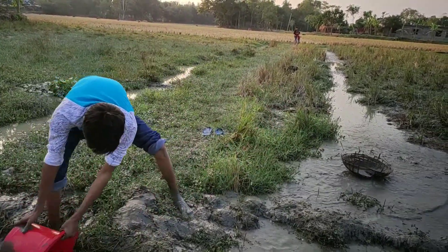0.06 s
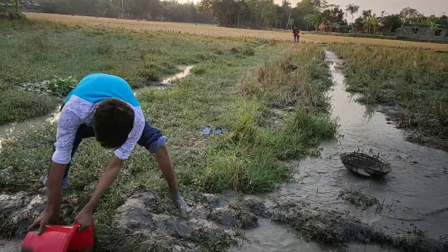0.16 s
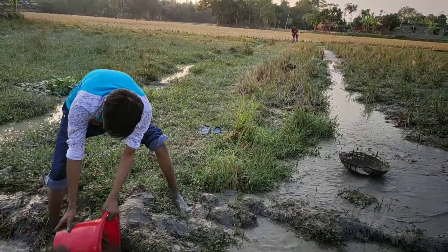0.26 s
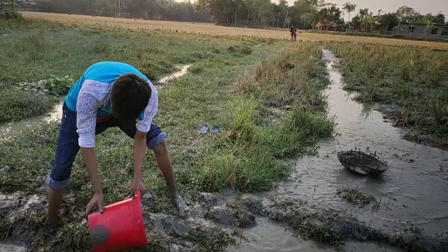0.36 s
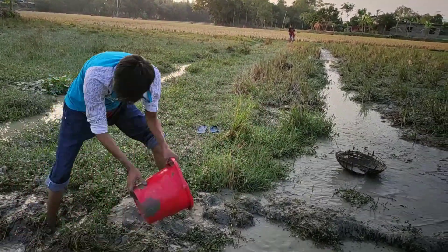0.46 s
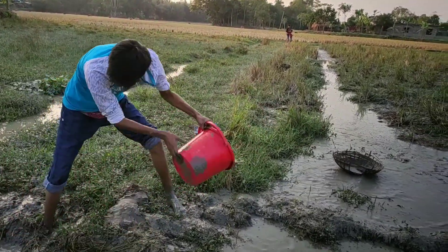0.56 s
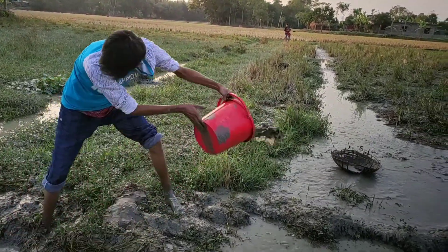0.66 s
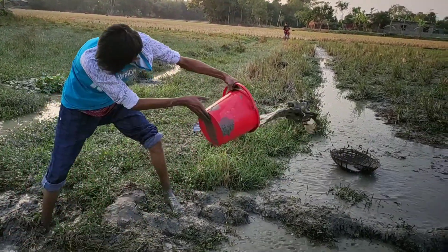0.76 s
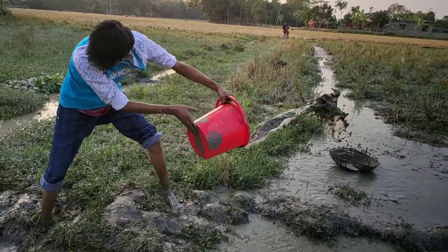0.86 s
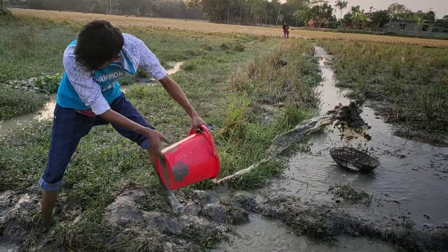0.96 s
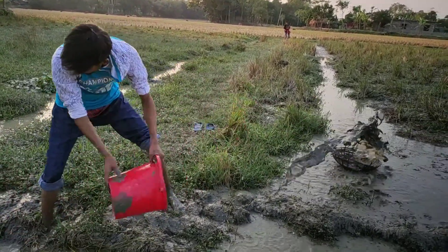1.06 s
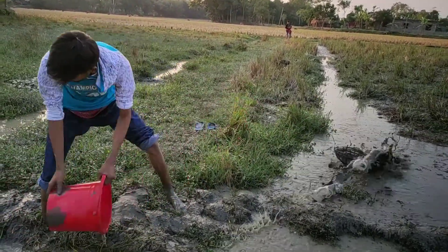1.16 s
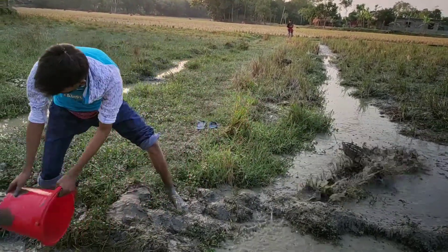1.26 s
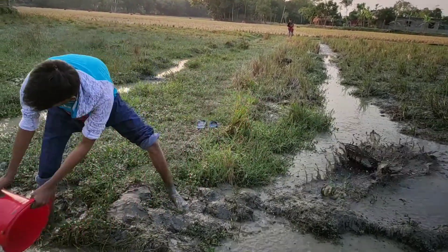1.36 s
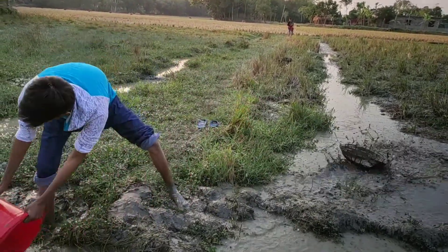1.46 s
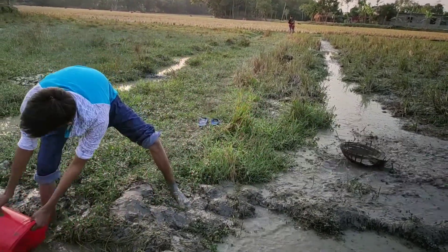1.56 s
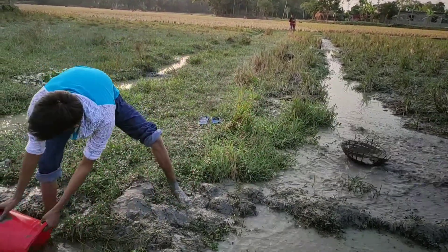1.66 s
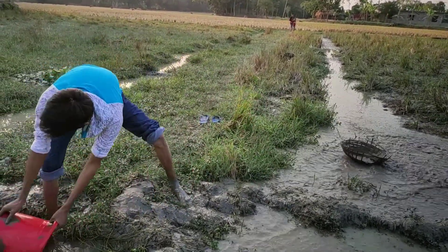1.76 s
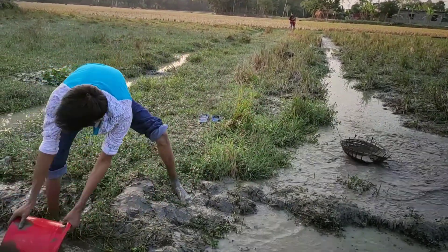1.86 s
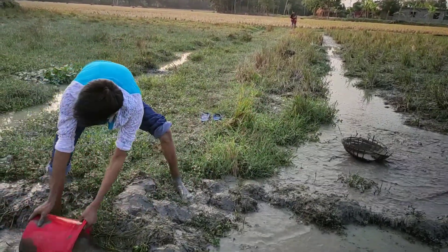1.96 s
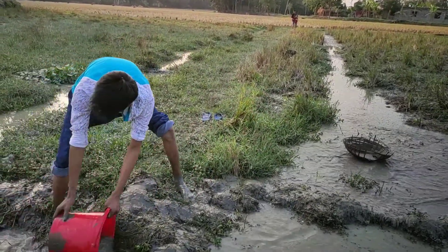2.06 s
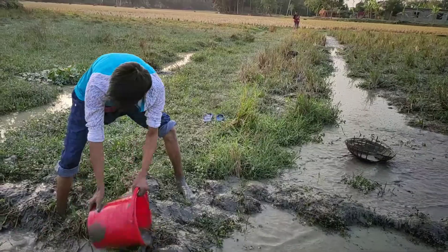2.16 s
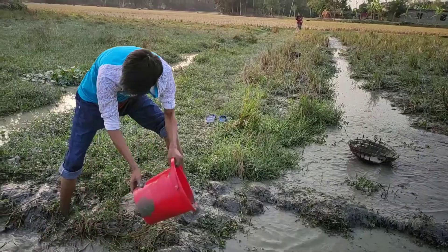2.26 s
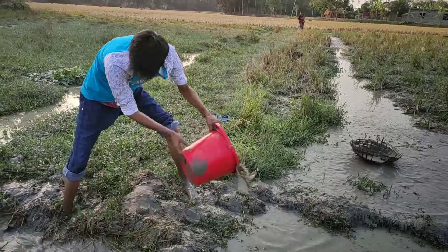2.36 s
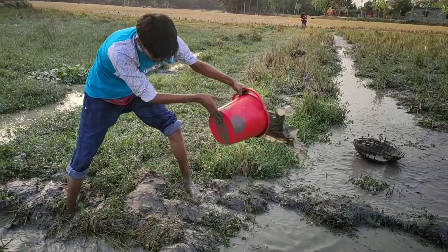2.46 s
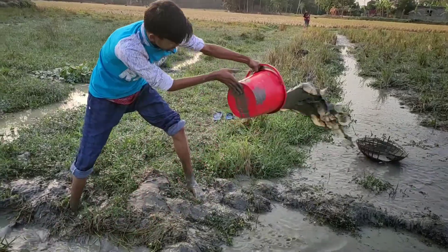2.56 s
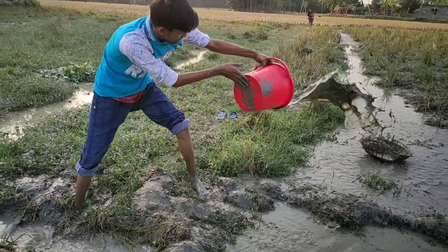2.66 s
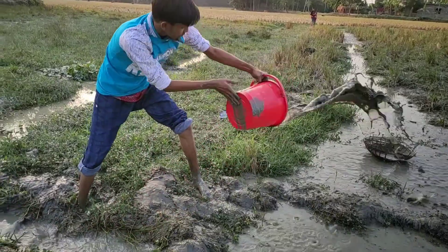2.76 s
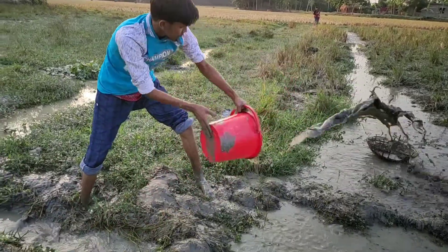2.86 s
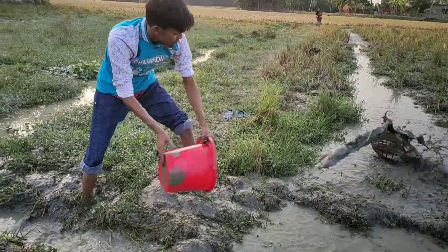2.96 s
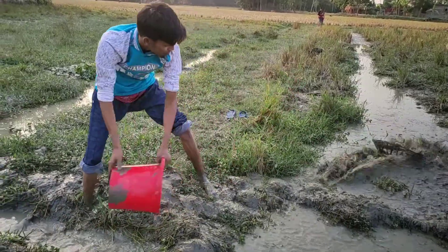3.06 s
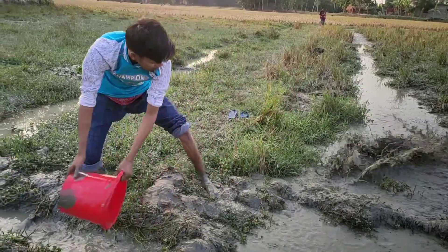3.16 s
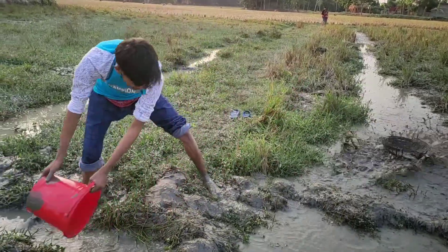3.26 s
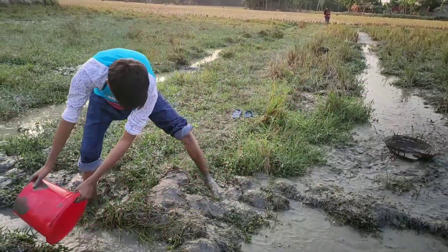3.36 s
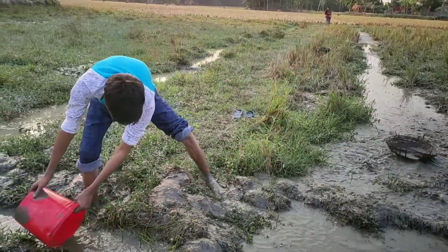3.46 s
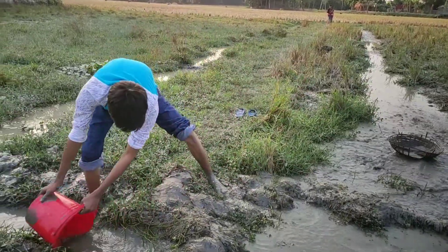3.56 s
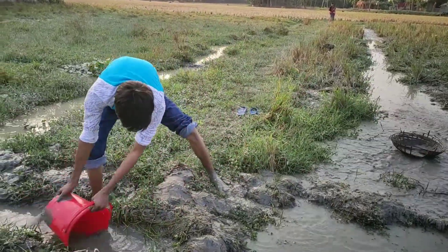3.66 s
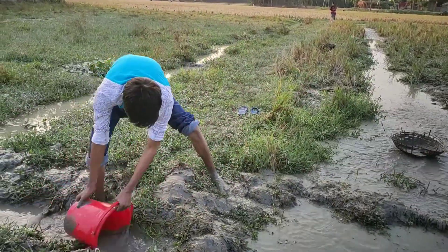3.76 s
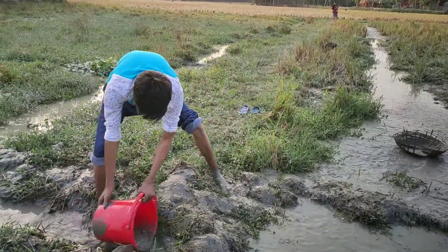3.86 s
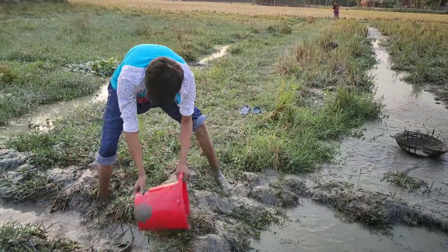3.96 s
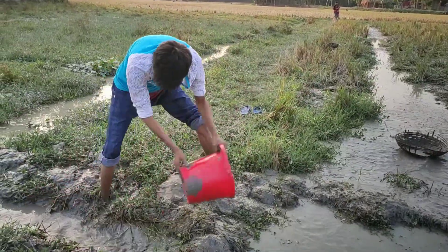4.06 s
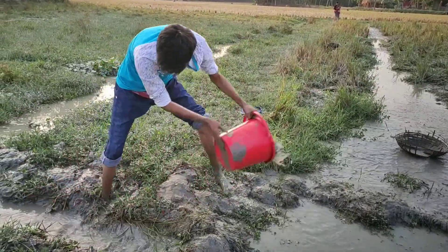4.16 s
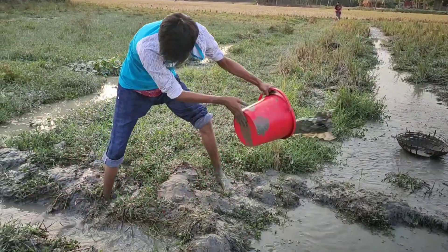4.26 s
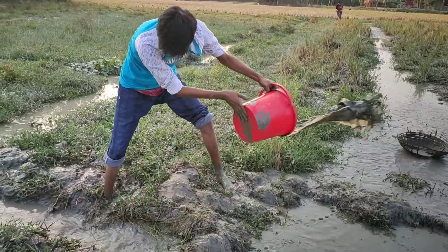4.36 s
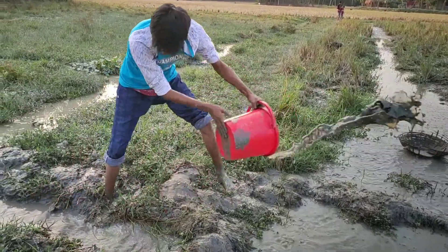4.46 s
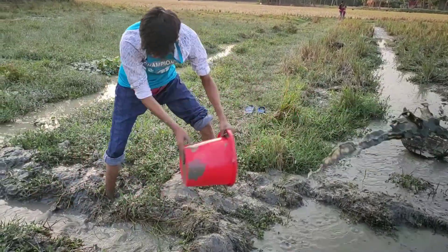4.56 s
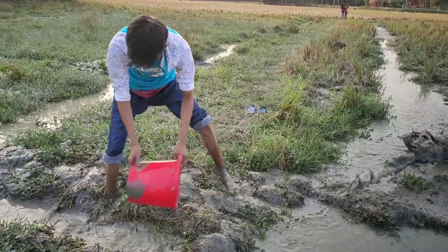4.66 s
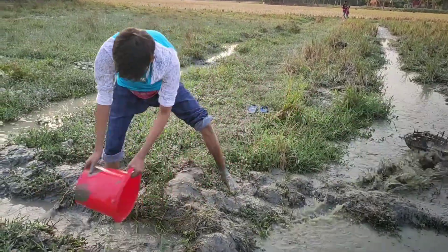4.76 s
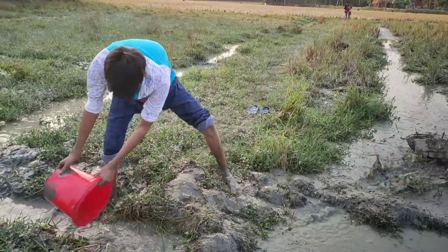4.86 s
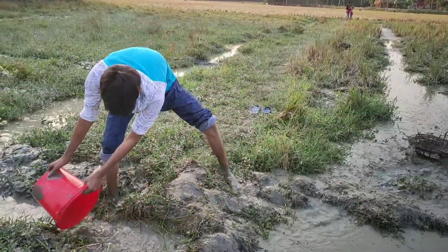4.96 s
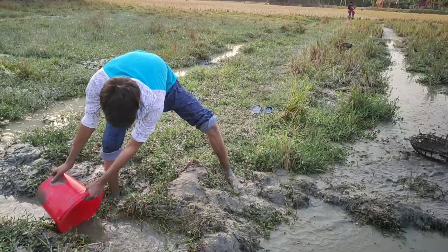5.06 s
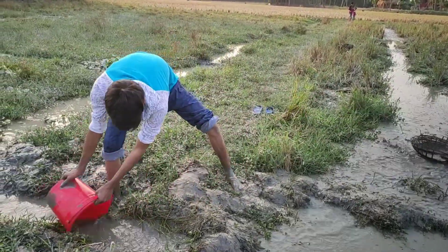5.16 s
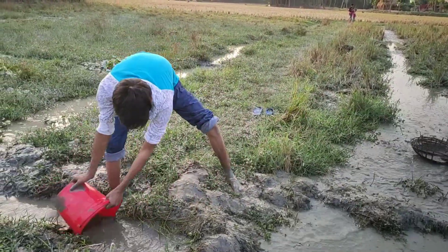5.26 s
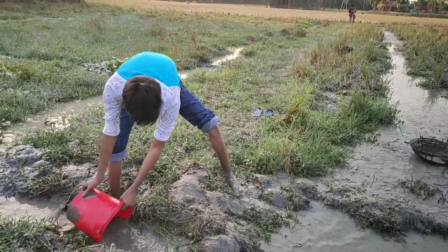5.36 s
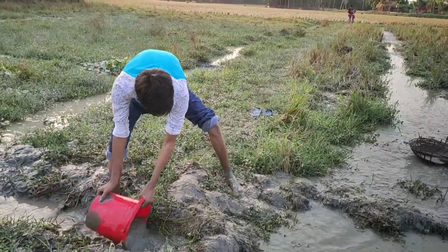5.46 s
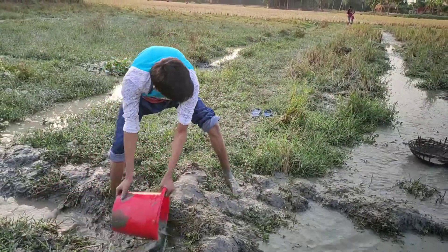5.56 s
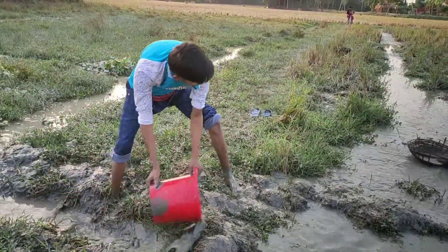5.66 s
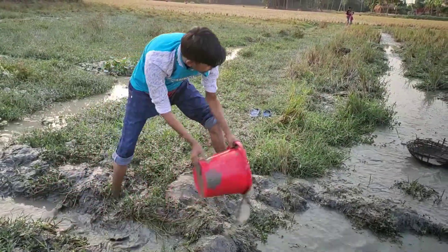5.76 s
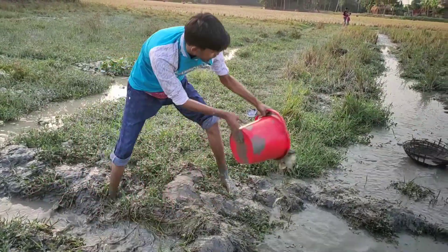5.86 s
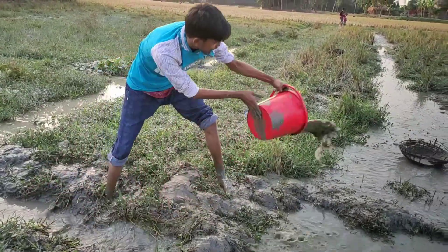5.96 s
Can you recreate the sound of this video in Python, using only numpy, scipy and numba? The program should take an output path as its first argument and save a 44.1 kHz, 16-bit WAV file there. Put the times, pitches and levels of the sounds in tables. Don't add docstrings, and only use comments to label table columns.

```python
import sys
import numpy as np
from scipy import signal
from scipy.fft import rfft, irfft, next_fast_len
from scipy.io import wavfile
from scipy.ndimage import uniform_filter1d, map_coordinates
from numba import njit

SR = 44100
rng = np.random.default_rng(int(sys.argv[2]) if len(sys.argv) > 2 else 0)


def master_out(mix):
    frames = np.transpose(np.atleast_2d(mix))
    ceiling = np.clip(frames, -1, 1)
    pcm = np.round(ceiling * 32767).astype(np.int16)
    wavfile.write(sys.argv[1], SR, pcm)


def gain_from_decibels(decibels):
    exponent = np.asarray(decibels, float) / 20
    return 10 ** exponent


N = 265041

# frequency_hz, left_minus_right_db
BUCKET_SIDES = [(300, 0), (1500, -1), (2200, -6), (3700, 7), (5000, -3), (6500, -7), (8500, -2),
                (10000, -6), (12500, -16), (15500, -13)]
# frequency_hz, left_minus_right_db
CHANNEL_SIDES = [(300, 0), (1600, -1), (2000, -3), (2800, 7), (4300, -1), (6000, 2), (8000, -2),
                 (10000, -9), (11300, -5), (12500, -18), (15500, -13)]


def unit(x):
    return x / np.sqrt(np.mean(np.atleast_2d(x).mean(0) ** 2) + 1e-20)


def along(points, hz):
    f, v = np.transpose(points)
    return np.interp(np.log(hz + 1), np.log(f + 1), v)


def curves(rows):
    s, *cols = np.transpose(rows)
    return [np.interp(np.arange(N) / SR, s, c) for c in cols]


def wobble(rate):
    knots = rng.standard_normal(int(N * rate / SR) + 4)
    return map_coordinates(knots, [np.arange(N) * rate / SR])


def filtered(x, response):
    m = next_fast_len(N + 8192)
    return irfft(rfft(x, m) * response(np.fft.rfftfreq(m, 1 / SR)), m)[..., :N]


def band(hz, low_hz, high_hz):
    return 1 / np.sqrt((1 + (low_hz / (hz + 1)) ** 8) * (1 + (hz / high_hz) ** 8))


def balance(hz, sides):
    return gain_from_decibels(along(sides, hz) / 2 * [[1], [-1]])


def swell(start, stop, db, rise_s, fall_s, sag_db=0):
    t = np.arange(N) / SR
    edge = np.minimum(t - start, 0) / rise_s - np.maximum(t - stop, 0) / fall_s
    sag = np.reshape(sag_db, (-1, 1)) * (np.clip(t, start, stop) - start)
    return gain_from_decibels(2 * (np.reshape(db, (-1, 1)) + 20 * edge - sag))


@njit
def add(out, start, hz, size, t60, rise, swell):
    for k in range(len(start)):
        n = int(t60[k] * SR * .6) + 2
        for i in range(min(n, len(out) - start[k])):
            u = i * hz[k] / SR
            fade = np.exp(-6.9 * i / SR / t60[k]) * (1 - np.exp(-u / swell))
            out[start[k] + i] += size[k] * fade * np.sin(2 * np.pi * u * (1 + rise[k] * i / n / 2))


def froth(rate, low_hz, high_hz, cycles, spread_db, noise, rise=0.5187):
    rows = np.zeros((3, N))
    for row in rows:
        r = rng.random((int(6 * rate), 4))
        start = (r[:, 0] * (N - SR // 10)).astype(int)
        hz = low_hz * (high_hz / low_hz) ** r[:, 1]
        size = gain_from_decibels(spread_db * np.minimum(-np.log(1 - r[:, 2]), 3))
        t60 = cycles * (1.37 + 3 * r[:, 3]) / hz
        add(row, start, hz, size, t60, rise * r[:, 3], 1.)
    z = rfft(rows)
    trend = np.sqrt(uniform_filter1d(np.mean(abs(z) ** 2, 0), size=1500))
    return irfft(z / (trend + 1e-9), N) * np.sqrt(N) + noise * rng.standard_normal((3, N))


def air():
    # frequency_hz, density_db
    rumble_colour = [(11, -16), (18, -3), (43, -2.5), (97, -4), (157, -15), (243, -22.5), (273, -18.5),
                     (300, -29), (390, -57), (660, -120)]
    # frequency_hz, density_db
    hiss_colour = [(120, -29.5), (200, -12), (500, 3), (1200, -3), (3000, -4), (6000, -10), (9000, -2),
                   (11500, -15), (15000, -10), (15800, -26)]
    # frequency_hz, left_minus_right_db
    hiss_balance = [(300, 1), (1500, 1), (3000, 4), (6000, -1), (8500, -3), (11000, -9), (12500, -13),
                    (15500, -12)]
    rumble_db, hiss_db = -50 + 4, -56.5

    def rumble_response(hz):
        return gain_from_decibels(along(rumble_colour, hz)) * [1 + 0 * hz, 0.3148 + 0.95 / (1 + (hz / 40) ** 2)]

    def hiss_response(hz):
        return gain_from_decibels(along(hiss_colour, hz)) * balance(hz, hiss_balance)

    c, d, _ = froth(90, 612.69, 6000, cycles=14, spread_db=2.5, noise=1.7506, rise=0.1652)
    hiss = filtered(np.array([c, d + 0.0637 * c]), hiss_response)
    rumble = filtered(rng.standard_normal((2, N)), rumble_response)
    rumble = np.array([[1.3082, 0.2951], [1.2034, -0.5035]]) @ rumble
    return gain_from_decibels(rumble_db + 1.604 * wobble(9.9)) * unit(rumble) + gain_from_decibels(hiss_db) * unit(hiss)


def wind():
    # start_s, stop_s, level_db
    gusts = [
        (1.221, 1.24, -50.5),
        (2.959, 2.98, -51),
        (3.76, 3.8, -47.5),
        (5.169, 5.202, -48),
        (5.581, 5.623, -41),
        (5.74, 5.771, -47.5),
        (5.92, 5.96, -44),
    ]
    # frequency_hz, density_db
    gust_colour = [(12, -5), (25, -0.5), (60, -6.5), (100, -16), (160, -40), (300, -120)]
    gain = np.sqrt(sum(swell(*gust, 0.1011, 0.083) for gust in gusts))
    buffeting = filtered(rng.standard_normal((2, N)), lambda hz: gain_from_decibels(along(gust_colour, hz)))
    return gain * unit(buffeting)


def trill(hz, width_hz, rate, sharp, jitter, blur, sweep_hz=0):
    strokes = 0.65975 + rate * np.arange(N) / SR + jitter * wobble(3.3)
    rasp = filtered(rng.standard_normal(N), lambda f: np.exp(-((f - hz) / width_hz) ** 2))
    carrier = 2 * np.pi * hz * np.arange(N) / SR
    fall = np.pi * sweep_hz / rate * (strokes % 1 - .5) ** 2
    tone = np.sin(carrier - fall + 1.058 * wobble(40))
    return unit((tone + blur * unit(rasp)) * abs(np.sin(np.pi * strokes)) ** sharp)


def crickets():
    # start_s, stop_s, level_db
    pulsing_bouts = [
        (1.15, 1.599, -44.5),
        (2.2, 3.2, -46.5),
        (4.7, 5.2, -53),
    ]
    edge_s = 0.4086
    tired_db = 1.5 * np.maximum(np.arange(N) / SR - 1.935, 0)
    high = trill(9900, 380, 105.1, sharp=5, jitter=.03, blur=.12, sweep_hz=1500)
    high = gain_from_decibels(-56.5 - tired_db - 1) * high * gain_from_decibels([[-3], [2.5]])
    low = trill(7397.1, 592, 103, sharp=0.3306, jitter=0.85, blur=8.3)
    low = gain_from_decibels(-58 - 2.0 + 2.63 * wobble(7.9)) * low * gain_from_decibels([[3], [-6]])
    bouts = np.sqrt(sum(swell(*bout, edge_s, edge_s) for bout in pulsing_bouts))
    pulsing = trill(4012.2, 300.3, 17.0, sharp=0.724, jitter=0.0882, blur=2.48)
    pulsing = gain_from_decibels(-13.0) * bouts * pulsing * gain_from_decibels([[.3], [-.3]])
    return high + low + pulsing


def bird():
    # start_s, length_s, from_hz, to_hz, level_db
    whistles = [(4.352, 0.0223, 3082, 3176, -58.5), (4.377, 0.00867, 3958, 3707, -53.5),
                (4.386, 0.01255, 3305, 3252, -59), (4.403, 0.0207, 3881, 4149, -53),
                (4.435, 0.0121, 4244, 4101, -62.5), (4.454, .009, 4004, 3995, -51),
                (4.467, 0.00889, 4107, 4501, -56), (4.481, 0.0122, 4690, 4414, -49.5),
                (4.491, 0.00698, 4791, 4693, -59.5), (4.497, 0.00808, 4307, 3505, -52),
                (4.506, 0.00892, 3342, 3196, -59.5), (4.509, 0.01705, 3299, 3236, -51.5),
                (4.527, 0.0171, 3200, 3181, -51.5), (4.543, 0.0161, 3154, 3022, -52)]
    out, flutter = np.zeros(N), 1 + 0.01936 * wobble(250)
    for s, length, from_hz, to_hz, db in whistles:
        start = round(s * SR)
        u = np.arange(0, 1, 1 / (length * SR))
        hz = (from_hz + (to_hz - from_hz) * u) * flutter[start:][:len(u)]
        tone = np.sin(2 * np.pi * np.cumsum(hz) / SR)
        out[start:][:len(u)] += gain_from_decibels(db) * np.sin(np.pi * u) ** 0.539 * tone
    out = out * gain_from_decibels(2.61 * wobble(200))
    return out + gain_from_decibels(-10) * np.roll(out, 330)


def drop_thuds():
    # start_s, peak_db, push_ms, pan_db
    hits = [
        (1.4186, -22, 1.3, 22),
        (3.212, -25, 1.3, 22),
    ]
    out, t = np.zeros((2, N)), np.arange(1500) / SR
    onset = 1 - np.exp(-t / 0.000067)
    rebound = 0.3423 * (1 - np.exp(-t / 0.00232)) * np.exp(-t / 0.009815)
    for s, db, ms, pan in hits:
        push = rebound - np.exp(-t * 1000 / ms)
        out[:, round(s * SR):][:, :len(t)] += gain_from_decibels(db + np.array([[pan], [-pan]]) / 2) * push * onset
    return out


def pour():
    # time_s, pitch_hz, level_db
    column = [
        (5.89, 560, -62),
        (5.92, 599, -58),
        (5.96, 727.6, -54),
        (5.99, 839.5, -49.5),
        (6.01, 894.3, -69.5),
    ]
    hz, db = curves(column)
    tone = np.sin(2 * np.pi * np.cumsum(hz) / SR)
    return gain_from_decibels(db - 1.5 + 3.0176 * wobble(60)) * tone * (np.arange(N) > 5.89 * SR)


def landing_masses():
    # start_s, peak_db, pitch_hz, t60_s
    impacts = [
        (1.19, -22, 41.54, 0.1683),
        (3.028, -26, 58.87, 0.11),
        (4.713, -22.5, 62.15, 0.0817),
    ]
    out = np.zeros(N)
    s, db, hz, t60 = np.transpose(impacts)
    add(out, (s * SR).astype(int), hz, gain_from_decibels(db), t60, np.zeros(len(s)), .4)
    return out


def large_bubbles():
    # start_s, peak_db, pitch_hz, t60_s
    pockets = [(0.218, -23, 1263, 0.03832), (0.565, -40.5, 1025, 0.0284), (0.741, -40.5, 1067, 0.0631),
               (1.177, -11, 790.5, 0.0269), (1.196, -20, 1100, 0.05292), (1.515, -35, 798.3, 0.04395),
               (2.099, -30, 306.7, 0.02455), (2.171, -31.5, 926.2, 0.05197), (2.209, -30.5, 1060, 0.02664),
               (2.365, -41, 1229, 0.03674), (2.883, -18, 1055, 0.01638), (3.013, -22, 1127, 0.09855),
               (3.02, -20, 600, .03), (1.25, -26, 1000, .03), (4.885, -33, 1100, .04),
               (4.915, -32, 1150, .04), (3.345, -32, 1680, .03), (3.736, -28.5, 290.5, 0.03707),
               (3.868, -34.5, 1269, 0.04146), (4.027, -30.5, 1280, 0.04674), (4.068, -22, 884.5, 0.04848),
               (4.259, -32, 573.6, 0.02081), (4.724, -3, 303.8, 0.02709), (5.144, -32.5, 734.6, 0.02191),
               (5.291, -32, 248.2, 0.0413), (5.416, -25, 235, 0.04798), (5.525, -35, 1326, 0.04466),
               (5.612, -20, 316.9, 0.05187), (5.695, -32, 1002, 0.0305), (5.753, -39.5, 1100, 0.0382),
               (5.773, -40.5, 1212, 0.0414), (5.827, -45.5, 1168, 0.0368)]
    out = np.zeros(N)
    s, db, hz, t60 = np.transpose(pockets)
    size, rise = gain_from_decibels(db + 5.5), np.full(len(s), .16)
    add(out, (s * SR).astype(int), hz * .93, size, np.clip(t60, .005, .2), rise, 3.5)
    return out


def slaps(rows, sides, lag, alike):
    out, t = np.zeros((2, N + 2048)), np.arange(2048) / SR
    f = np.fft.rfftfreq(len(t), 1 / SR) + 1
    decay = gain_from_decibels(-60 * t / 0.008444) + 0.24505 * gain_from_decibels(-60 * t / 0.07052)
    fall = decay * (1 - np.exp(-t / 0.000694))
    share = np.clip(alike, 0, 1)
    for s, db, hz, spit_db in rows:
        noise = rfft(rng.standard_normal((3, len(t))))
        noise = np.sqrt(share) * noise[0] + np.sqrt(1 - share) * noise[1:]
        burst = irfft(noise * np.exp(-(np.log(f / hz) / 0.6083) ** 2))
        spit = irfft(noise * (f > 5000) / (1 + (f / 10000) ** 4))
        ring = 1.4099 * np.sin(2 * np.pi * hz * t * (1 + 3 * t))
        drop = fall * (burst / burst.std() + ring + gain_from_decibels(spit_db + 2.0) * spit / spit.std())
        for side, late in enumerate((lag, 0)):
            out[side, round(s * SR) + late:][:len(t) - late] += gain_from_decibels(db - 9.5) * drop[side, :len(t) - late]
    return filtered(out[:, :N], lambda hz: balance(hz, sides))


def bucket_slaps():
    # start_s, peak_db, ring_hz, spit_db
    knocks = [(0.056, -25, 4498, -3), (0.169, -19, 1793, -18.5), (0.1835, -17, 2141, -23),
              (0.2204, -20, 1675, -16), (0.385, -18, 5250, -19), (0.5392, -31, 2128, -16),
              (0.6887, -33, 2119, -12), (1.9734, -22, 3235, -17.5), (2.035, -22, 2637, -9.5),
              (2.101, -28.5, 4970, -1.5), (2.3204, -28.5, 2645, -15.5), (2.658, -22, 3600, -8.5),
              (2.659, -20, 4971, -11), (3.6516, -24, 2317, -7.5), (3.8356, -19, 2300, -22),
              (3.838, -21, 3567, -19.5), (3.842, -21.5, 1696, -21), (3.916, -23.5, 6102, -5),
              (3.9908, -20, 2287, -21), (4.031, -26.5, 1901, -13.5), (5.143, -23.5, 2515, -20),
              (5.3833, -27, 1853, -10.5), (5.4478, -35, 2244, 12), (5.5383, -15, 6188, -17),
              (5.594, -27, 1988, -15.5), (5.683, -23, 6507, -9.5), (5.686, -28, 2409, -16),
              (5.6994, -23, 1111, -1), (5.946, -28, 5672, -12), (5.894, -29.5, 6242, -16),
              (5.9531, -17, 1397, -13), (5.913, -33, 5000, -12), (5.9866, -19, 1600, -10)]
    return slaps(knocks, BUCKET_SIDES, round(SR * .0005), alike=0.7692)


def channel_slaps():
    # start_s, peak_db, ring_hz, spit_db
    mud_clots = [(0.9677, -31.5, 6990, -5), (1.0106, -28.5, 2325, -3.5), (1.0495, -15.5, 4290, -13.5),
                 (1.0886, -11, 4295, -21), (1.1575, -10, 2196, -2), (1.1787, -9.5, 2343, 2),
                 (1.3957, -19, 2336, -19.5), (1.4177, -24.5, 1712, -15), (1.553, -19.5, 2331, -20.5),
                 (1.601, -17.5, 2277, -24.5), (1.6513, -30, 4573, -13.5), (2.7462, -30, 4739, -0.5),
                 (2.7796, -22, 2993, -14.5), (2.812, -26, 2490, 6), (2.8766, -12, 2309, -14.5),
                 (2.886, -16, 1680, -0.5), (2.9643, -23, 4560, 6), (3.0066, -4.5, 5679, -26.5),
                 (3.0176, -17, 2361, 3.5), (3.5019, -21, 3715, -11.5), (3.5519, -19, 5500, -12),
                 (3.5848, -25.5, 2524, -18.5), (4.6084, -34.5, 4945, -3.5), (4.666, -25, 5024, 2.5),
                 (4.7038, -17, 2396, 2), (4.7157, -4.5, 1573, -5),
                 (0.9918, -32.5, 3580, -11.5), (1.066, -16.5, 3762, -13), (1.122, -23.5, 910.7, -15),
                   (1.1952, -11.5, 2288, -9.5), (1.2, -10, 1099, -12.5), (1.2095, -10, 1011, -11),
                   (1.221, -15.5, 2192, -9), (1.2525, -19.5, 997.3, -18.5), (1.3063, -25.5, 4487, -10.5),
                   (1.3699, -27.5, 2279, -12.5), (1.432, -22.5, 1499, -15.5), (1.565, -27.5, 7000, -7),
                   (1.693, -29.5, 5425, -10), (2.6397, -31.5, 4463, -10.5), (2.706, -31.5, 6630, -7),
                   (2.7285, -30, 6702, -3.5), (2.803, -32.5, 5020, -9), (2.8511, -29.5, 3967, -6),
                   (3.01, -8, 2287, -9), (3.024, -11.5, 988, -14), (3.031, -13, 1105, -14),
                   (3.049, -16, 899.3, -14), (3.054, -20, 3831, -14), (3.19, -28, 2363, -14),
                   (3.3411, -21, 1660, -13.5), (4.348, -37.5, 5198, -11.5), (4.6763, -22, 4937, -3),
                   (4.7205, -8.5, 1201, -11.5), (4.7249, -16, 2292, -11.5), (4.7343, -12.5, 4200, -14),
                   (4.7515, -16.5, 1002, -10), (5.033, -29.5, 1608, -16), (5.047, -27, 2294, -16),
                   (5.088, -30, 1493, -15.5)]
    return slaps(mud_clots, CHANNEL_SIDES, 0, alike=0.4277)


def ports(streams, colour, sides, alike, lag_ms, turn, direct):
    hz = np.fft.rfftfreq(N, 1 / SR)
    late = np.exp(-1j * (2 * np.pi * hz * lag_ms / 1000 - turn * np.tanh(hz / 900)))
    near = direct / (1 + (hz / 1300) ** 4) + 0.1305 * direct
    share = np.clip(along(alike, hz), 0, 1)
    paths = [(near + late) / np.sqrt(1 + near ** 2), 1 + 0 * hz]
    pair = np.sqrt(share) * streams[0] * paths + np.sqrt(1 - share) * streams[1:]
    return unit(irfft(pair * colour(hz) * balance(hz, sides), N))


def at_bucket(streams, low, high):
    # frequency_hz, density_db
    bucket_colour = [(88, -46), (150, -16.5), (308, -2.5), (521, -17), (711, -10.5), (1220, -8.5),
                     (1550, -11), (2190, -15), (3370, -20), (6390, -20), (8560, -28), (10200, -25.5),
                     (15600, -39.5)]
    # frequency_hz, share
    alike = [(300, 1), (1500, 0.6807), (3000, 0.912), (7000, 0.2856), (10000, 0.087)]

    def colour(hz):
        return gain_from_decibels(along(bucket_colour, hz)) * band(hz, low, high)

    return ports(streams, colour, BUCKET_SIDES, alike, lag_ms=0.48453, turn=1.541, direct=0.0547)


def at_channel(streams, low, high):
    # frequency_hz, density_db
    channel_colour = [(88, -22.5), (150, -10), (326, -12.5), (420, -9.5), (521, -23.5), (620, -10.5),
                      (800, -6.5), (1130, -6), (1880, -8), (2280, -4), (2770, -19), (4090, -12.5),
                      (9810, -22), (11500, -26.5), (13100, -24), (15600, -29)]
    # frequency_hz, share
    alike = [(1000, 1), (2200, 0.2062), (4000, 0.276), (6000, 0.03744), (10000, 0.2164)]

    def colour(hz):
        return gain_from_decibels(along(channel_colour, hz)) * band(hz, low, high)

    return ports(streams, colour, CHANNEL_SIDES, alike, lag_ms=0.62148, turn=3.767, direct=6.403)


def surges(rows, rise_s, fall_s, spray_db=-4.5):
    return sum(swell(s, s, [db + low_db, db, db + spray_db], rise_s, fall_s) for s, db, low_db in rows)


def throwing():
    # first_drops_s, first_drops_db, landing_s, landing_db, swell_20_db_s
    throws = [
        (1.013, -40.5, 1.197, -25.5, 0.1282),
        (2.782, -45.5, 3.016, -20.5, 0.0307),
        (4.664, -38.5, 4.722, -22, 0.0001),
    ]
    # start_s, stop_s, level_db, thinning_db_per_s
    rains = [
        (1.364, 1.635, -41, 0.5),
        (3.199, 3.546, -40.5, 0),
        (4.914, 5.098, -40, 38.5),
    ]
    # start_s, level_db, gurgle_over_it_db
    sheets = [(1.125, -30.5, -16), (1.18, -26.5, 5.5), (1.2, -29.5, 3.5), (1.217, -27.5, -0.5),
              (1.305, -40.5, 2.5), (1.421, -31.5, -22.5), (2.881, -34.5, -10.5), (2.97, -35, -5),
              (3.033, -27, 4), (3.055, -29, 5), (3.215, -53, -20), (4.728, -23.5, 5.5)]
    # start_s, stop_s, level_db
    mists = [
        (2.117, 2.142, -43),
        (2.693, 2.74, -50),
        (5.911, 5.991, -47),
    ]
    mist_mix, first_mix, landing_mix, rain_mix = [-39.5, -22, -1.5], [-16.5, -11, 1.5], [-1, 1.5, 0], [-11.5, 2, -0.5]
    mist_s, first_s, collapse_s, first_db_per_s = 0.043, 0.01835, 0.070166, 61.5
    rain_in_s, rain_out_s = np.array([[.4], [.45], [.25]]), 0.151
    heavy_thinning = 26 * np.array([1, 1, 0])

    power = surges(sheets, 0.02879, 0.047075)
    for start, stop, db in mists:
        power = power + swell(start, stop, np.add(db, mist_mix), mist_s, mist_s)
    for first, first_db, land, db, swell_s in throws:
        power = power + swell(first, land, np.add(first_db, first_mix), first_s, collapse_s, -first_db_per_s)
        power = power + swell(land, land, np.add(db, landing_mix), swell_s, collapse_s)
    for start, stop, db, thin_db in rains:
        thinning = thin_db + heavy_thinning
        power = power + swell(start, stop, np.add(db, rain_mix), rain_in_s, rain_out_s, thinning)
    return np.sqrt(power)


def scooping():
    # plunge_s, full_drag_s, lift_s, drag_db, hollow_gurgle_over_it_db
    scoops = [
        (0.098, 0.166, 0.42788, -42.5, 2.5),
        (1.942, 2.095, 2.1681, -43, 1),
        (3.728, 3.839, 4.0734, -43.5, 3),
        (5.288, 5.553, 5.69, -46, 0),
    ]
    # start_s, level_db, gurgle_over_it_db
    gulps = [(0.058, -46.5, 6), (0.223, -37.5, 1), (0.389, -46, 0), (0.655, -50.5, -10), (0.73, -49, -12),
             (2.019, -41.5, -10.5), (1.975, -52.5, 8.5), (2.107, -36.5, 4.5), (2.14, -44, 8),
             (2.19, -39, -5.5), (2.265, -45.5, 1.5), (3.755, -52, 10), (3.837, -37, 0), (3.919, -37.5, 4),
             (4.076, -39, -9), (5.148, -59, -4.5), (5.308, -50.5, -0.5), (5.386, -46.5, -9),
             (5.416, -52, 8.5), (5.465, -49, 9.5), (5.615, -47.5, 10), (5.699, -41, -11.5),
             (5.73, -48, -8.5)]
    plunge_mix, drag_mix, drip_mix, trickle_mix = [-5, -9.5, -10], [-2, 0.5, 0], [-21, -5.5, -7.5], [-63.5, -69, -61]
    plunge_s, drag_s, lift_s, runoff_s = 0.18585, 0.0758, 0.07816, 20 / 74.5

    power = surges(gulps, 0.03798, 0.04141) + gain_from_decibels(2 * np.reshape(trickle_mix, (-1, 1)))
    for plunge, drag, lift, db, low_db in scoops:
        db = db + np.array([low_db, 0, 0])
        power = power + swell(plunge, drag, db + plunge_mix, plunge_s, lift_s)
        power = power + swell(drag, lift, db + drag_mix, drag_s, lift_s)
        power = power + swell(lift, lift, db + drip_mix, lift_s, runoff_s)
    return np.sqrt(power)


def water():
    clumps = wobble(45)
    patter = unit(gain_from_decibels(1.3 * wobble(280)))
    gurgle = froth(480, 148.3, 639.59, cycles=2.2657, spread_db=2.5, noise=0.6964)
    slosh = froth(1100, 502.0, 3553.8, cycles=15, spread_db=4.5, noise=0.55, rise=0.19153)
    spray = froth(1500, 2542.2, 14911, cycles=14, spread_db=4.5, noise=0.9, rise=0.1073)
    layers = [gurgle, slosh, spray]
    bucket_edges = [(200, 517), (520, 3837), (3000, 28300)]
    open_edges = [(200, 892.6), (880, 4651), (3000, 31050)]
    trims_db = [-3.5, -.8, -.3]
    out = 0
    parts = zip(layers, bucket_edges, open_edges, scooping(), throwing(), trims_db)
    for streams, inside, wide, near, far, trim_db in parts:
        streams = rfft(streams * gain_from_decibels(0.7 * clumps + 1.3 * wobble(90)))
        scooped = near * at_bucket(streams, *inside)
        thrown = far * patter * at_channel(streams, *wide)
        out = out + gain_from_decibels(trim_db) * (scooped + thrown)
    return out


def scene():
    tones = pour() + landing_masses() + large_bubbles()
    tones = np.array([np.roll(tones, 2), tones])
    background = air() + wind() + crickets() + bird()
    drops = drop_thuds() + bucket_slaps() + channel_slaps()
    return background + tones + drops + water()


def band_limit(x):
    return signal.sosfilt(signal.butter(12, 15790, fs=SR, output="sos"), x)


def record(dry):
    def phone_response(hz):
        return (1 - 0.3265 * np.exp(-((hz - 525) / 45) ** 2)) * (hz < 15850)

    held = dry / (1 + abs(dry / .68) ** 4) ** (1 / 4)
    mix = filtered(held, phone_response)
    return band_limit(mix)


dry = scene()
out = record(dry)
master_out(out)
```